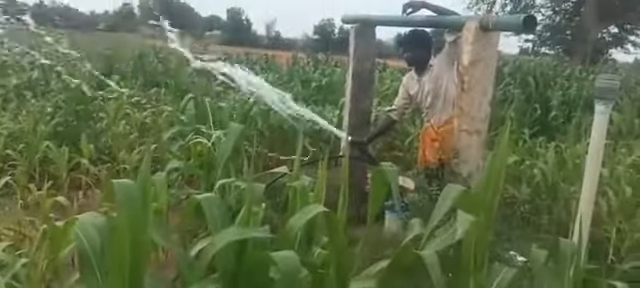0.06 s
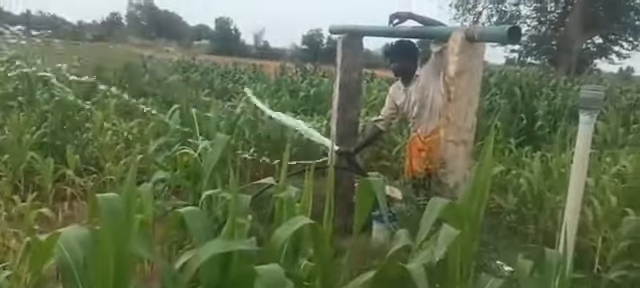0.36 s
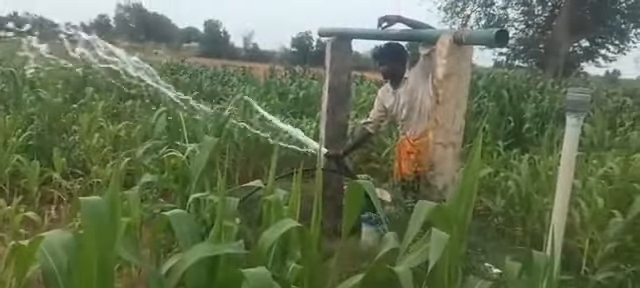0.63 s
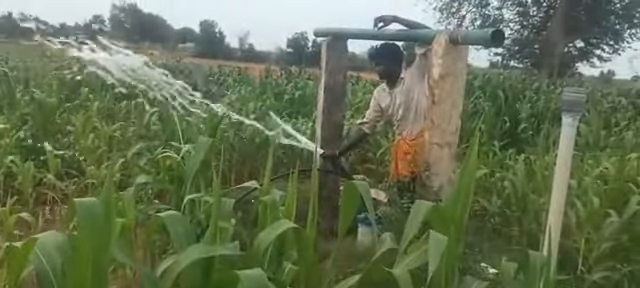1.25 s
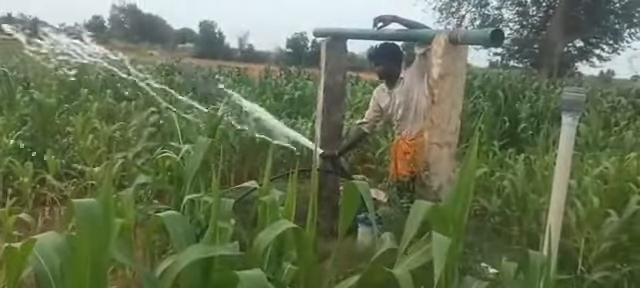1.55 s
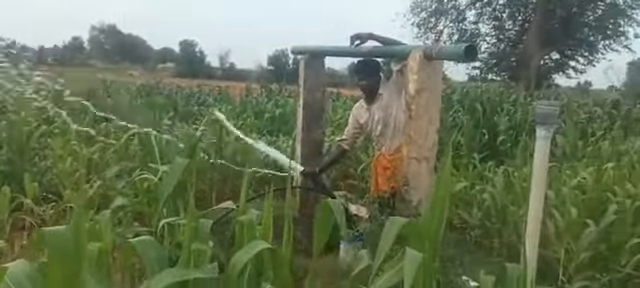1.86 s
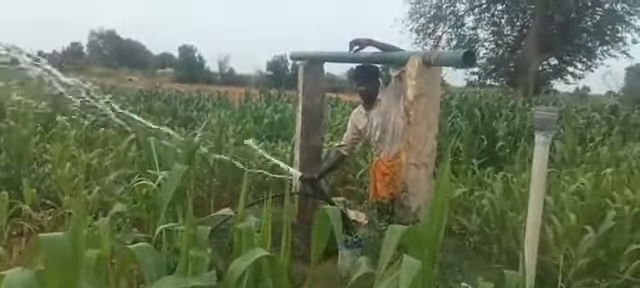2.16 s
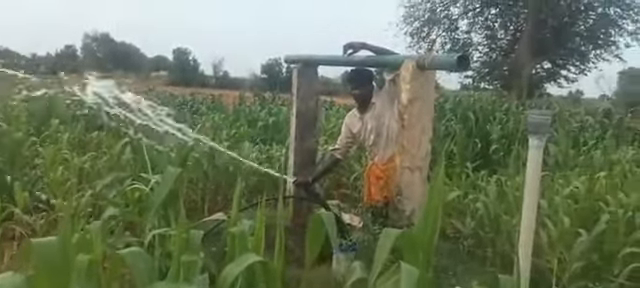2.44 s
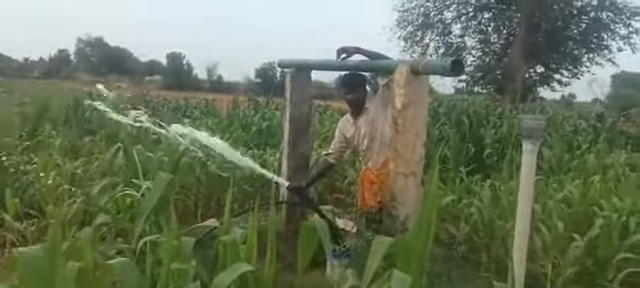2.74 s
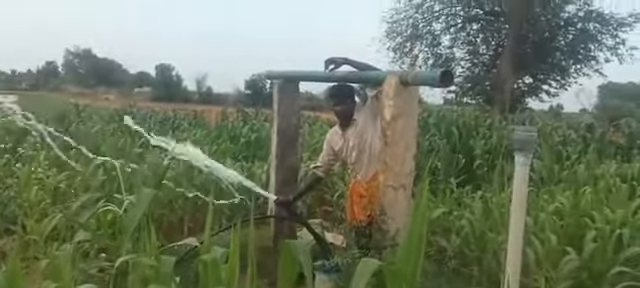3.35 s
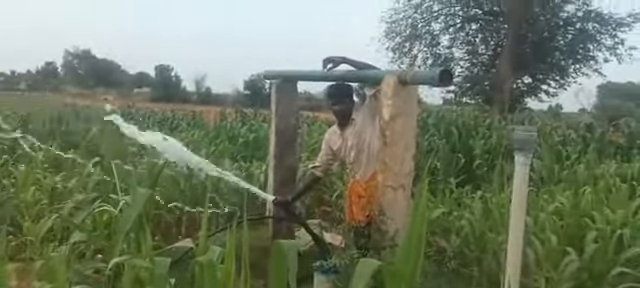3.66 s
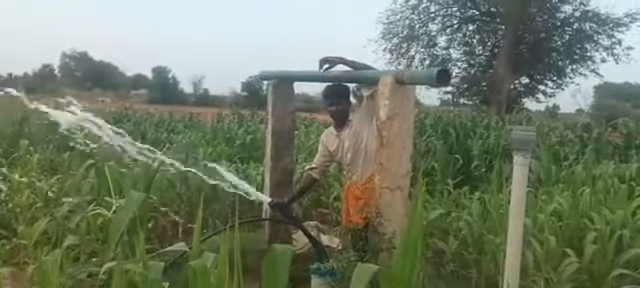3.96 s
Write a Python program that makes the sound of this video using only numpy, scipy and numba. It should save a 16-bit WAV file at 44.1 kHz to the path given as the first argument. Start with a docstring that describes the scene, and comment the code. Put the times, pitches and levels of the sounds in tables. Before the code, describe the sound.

Surges of water and air sputter from a pipe in a farm field, nearly three a second, with splashing spray, pops and the odd glug. Wind rumble on the phone microphone starts faint, then grows into thumping gusts.

```python
"""From the start a borewell pipe throws water and air across a crop field a few metres away, in surges
nearly three a second. In each surge the jet tears and hisses, the mouth rings and spray fizzes over
the leaves. Spits and popping air pockets soon join in, and after a second the odd hollow glug.
Gusts, faint at first, buffet the two microphone ports of a phone in turn, hardest towards the end."""
import sys
import numpy as np
from scipy import signal
from scipy.fft import rfft, irfft
from scipy.io import wavfile
from numba import njit

SR = 44100
rng = np.random.default_rng(int(sys.argv[2]) if len(sys.argv) > 2 else 0)


def put_to_file(sound):
    """Save the sound as 16-bit audio at rate SR, in the file named by the first command-line argument."""
    columns = np.atleast_2d(sound).T  # one column per channel
    safe = np.clip(columns, -1, 1)
    whole_steps = np.round(safe * 32767)
    wavfile.write(sys.argv[1], SR, whole_steps.astype(np.int16))


N = 176400
T = np.arange(N) / SR

# Surges of the jet. Each row: time in seconds, relative levels of the gush and of the air hiss in dB.
SURGES = [(0, -63, -57), (0.05, -53.5, -42.5), (0.135, -48, -39.5), (0.145, -42, -32.5), (0.25, -33.5, -33),
          (0.33, -38.5, -45), (0.39, -36, -37.5), (0.42, -47.5, -41), (0.46, -38.5, -41), (0.56, -32, -34),
          (0.63, -40, -39.5), (0.675, -33.5, -33), (0.69, -46.5, -45.5), (0.79, -56, -44.5),
          (0.865, -56, -40), (0.885, -37, -28), (0.935, -39.5, -37), (1.0, -32, -38), (1.1, -40, -43.5),
          (1.165, -43, -36.5), (1.2, -37.5, -30.5), (1.26, -34, -27), (1.31, -38, -37), (1.37, -32.5, -40),
          (1.39, -44, -43), (1.44, -49.5, -37), (1.46, -42, -30.5), (1.53, -33, -39.5), (1.59, -39.5, -37),
          (1.69, -38.5, -31), (1.71, -41.5, -37.5), (1.87, -55, -43.5), (2.0, -42.5, -40.5),
          (2.04, -37.5, -31), (2.07, -36, -43.5), (2.13, -43.5, -33.5), (2.165, -34, -36),
          (2.21, -50.5, -46.5), (2.35, -46.5, -38), (2.39, -34, -34), (2.425, -44, -38),
          (2.48, -33.5, -32.5), (2.52, -48, -38), (2.7, -54, -41), (2.715, -38, -31.5),
          (2.83, -42.5, -36.5), (2.88, -38.5, -42), (2.92, -54.5, -39), (3.02, -59.5, -48),
          (3.035, -52.5, -42.5), (3.15, -45.5, -36), (3.2, -35.5, -29.5), (3.28, -32.5, -34.5),
          (3.3, -43.5, -47), (3.355, -51, -47), (3.43, -55, -35), (3.48, -37, -34), (3.55, -43, -39.5),
          (3.61, -33, -34), (3.665, -39.5, -36.5), (3.69, -50, -47), (3.77, -51.5, -37.5),
          (3.865, -31.5, -31), (3.91, -44, -43), (4.0, -43.5, -38.5)]


def undb(db):
    return 10 ** (np.asarray(db) / 20)


def unit(x):
    return x / np.sqrt(np.mean(x ** 2))


def add(out, start_s, sound):
    i = int(np.clip(start_s * SR, 0, N - 1))
    out[i:i + len(sound)] += sound[:N - i]


def envelope(table, column):
    """Amplitude envelope: levels in dB against time become a gain for every sample."""
    rows = np.array(table, float)
    return undb(np.interp(T, rows[:, 0], rows[:, column]))


def response(table, size, column=1):
    """Magnitude response: levels in dB against frequency become a gain for every bin."""
    rows = np.array(table, float)
    bin_hz = np.arange(size // 2 + 1) * SR / size
    return undb(np.interp(np.log(bin_hz + 1), np.log(rows[:, 0]), rows[:, column]))


def colour(x, table, column=1, size=8192):
    """Minimum-phase filtering: folding the cepstrum gives a causal filter with the given spectrum."""
    cepstrum = irfft(np.log(response(table, size, column)))
    cepstrum[1:size // 2] *= 2
    cepstrum[size // 2 + 1:] = 0
    return signal.fftconvolve(x, irfft(np.exp(rfft(cepstrum))))[:N]


def wander(per_s):
    """Random modulation: interpolated Gaussian values with a spread near 1."""
    points = rng.standard_normal(N // 20)
    return np.interp(T * per_s, np.arange(len(points)), points) * np.sqrt(3 / 2)


def impacts(per_s, spread_db):
    """Shot noise: independent impulses of random sign and uneven size."""
    hits = (rng.random(N) < per_s / SR) * rng.choice([-1, 1], N)
    return unit(hits * undb(spread_db * np.clip(rng.standard_normal(N), -2, 2)))


def ring(t, hz, decay_s, glide_per_s):
    """Damped oscillation: a decaying sine whose frequency may glide linearly."""
    return np.exp(-t / decay_s) * np.sin(2 * np.pi * hz * (t + glide_per_s * t * t / 2))


@njit
def resonate(x, hz, q):
    """Forced resonance: one mode with a moving centre frequency and a gain near 1 there."""
    y, state = np.empty(len(x)), 0j
    for i in range(len(x)):
        omega = 2 * np.pi * hz[i] / SR
        state = state * np.exp(omega * (1j - .5 / q)) + x[i] * omega / q
        y[i] = state.real
    return y


def wind(port_limit=.26):
    """Turbulent pressure: eddies rumble and thump on each port separately; saturation rounds the peaks."""
    # Each row: time in seconds, relative levels at the left and right ports in dB.
    gusts = [(0, -54, -48.5), (.12, -62, -58), (.2, -59, -45), (.35, -66, -64), (.8, -55, -65),
             (1.02, -58, -41.5), (1.15, -68, -61), (1.36, -55.5, -53), (1.55, -67, -63), (1.9, -55, -56),
             (1.95, -57, -42.5), (2.1, -57, -55.5), (2.36, -51.5, -70), (2.4, -52, -32), (2.48, -42.5, -44),
             (2.66, -45, -60), (2.69, -20, -53), (2.76, -30, -52), (2.81, -45, -57), (2.88, -43, -38.5),
             (2.96, -34, -60), (3.15, -33, -41), (3.19, -39, -16.5), (3.45, -38.5, -21.5),
             (3.53, -54, -31.5), (3.66, -45, -19), (3.8, -69, -45), (4.0, -56, -63)]
    # Each row: frequency in Hz, gain in dB.
    eddy_spectrum = [(15, -8.5), (55, 8.5), (115, 3.5), (170, -3.5), (250, -13.5), (350, -24.5)]
    # Each row: start in seconds, relative level in dB, port struck.
    hard_eddies = [(2.396, -15.5, "R"), (2.707, -17.5, "L"), (3.196, -8, "R"), (3.238, -8, "R"),
                   (3.307, -19, "R"), (3.332, -16.5, "R"), (3.45, -12, "R"), (3.648, -8, "R"),
                   (3.773, -19.5, "R")]
    out = np.zeros((2, N))
    for side in range(2):
        buffeting = rng.standard_normal(N) * undb(4 * wander(per_s=70))
        out[side] = undb(-1) * envelope(gusts, side + 1) * unit(colour(buffeting, eddy_spectrum))
    pulse = ring(T[:SR // 20], hz=105.4, decay_s=.0063, glide_per_s=0)
    thump = signal.sosfilt(signal.butter(4, 230, fs=SR, output="sos"), pulse)
    for start, db, port in hard_eddies:
        add(out["LR".index(port)], start, undb(db) * thump)
    rounded = port_limit * np.tanh(out / port_limit)
    return signal.sosfilt(signal.butter(10, 390, fs=SR, output="sos"), rounded)


def scatter(x, scatter_db, size=4096, hop=512, port_lag_s=.00137):
    """Multipath scattering: as the water moves, each splash echoes off pillars and leaves by new paths."""
    # Each row: frequency in Hz, scattered against direct sound in dB before scatter_db is added.
    scatter_spectrum = [(300, -6), (700, -5), (1200, 0), (2200, -2), (4000, 2), (6000, 10), (15000, 16)]
    share = response(scatter_spectrum, 2 * size) * undb(scatter_db)
    t, starts = T[:size], np.arange(0, N, hop)
    frames = np.pad(x, (0, 2 * hop))[starts[:, None] + np.arange(2 * hop)]
    splashes = rfft(frames * signal.get_window("hann", 2 * hop), 2 * size)
    tail = np.exp(-t / .0018) + undb(-13) * np.exp(-t / .018)  # quick scatter, then the fainter field
    tail /= np.sqrt(np.sum(tail ** 2))
    out = np.zeros((2, N))
    for side, lag_s in enumerate((port_lag_s, 0)):  # sound reaches the right port first
        echoes = rfft(rng.standard_normal((len(starts), size)) * tail, 2 * size)
        delay = np.exp(-1j * np.pi * np.arange(size + 1) * SR / size * lag_s)
        arrivals = irfft(splashes * delay * (1 + share * echoes) / np.sqrt(1 + share ** 2))
        for start, sound in zip(starts, arrivals):
            add(out[side], (start + .5) / SR, sound[:size + 2 * hop])
    return out


def spray(follow=.21):
    """Incoherent sources: droplets fizz with each surge, spread so wide that each port hears its own."""
    # Each row: frequency in Hz, gain in dB.
    droplet_spectrum = [(450, -20.5), (900, -16.5), (4500, -24.5), (6000, -13.5), (8000, -5.5), (15000, -4)]
    swell = (envelope(SURGES, 1) * envelope(SURGES, 2)) ** follow
    level = undb(-7.5) * swell * undb(2.3 * wander(per_s=450))
    droplets = [level * impacts(per_s=12000, spread_db=1.5) for side in range(2)]
    return np.array([colour(patter, droplet_spectrum) for patter in droplets])


def glugs(decay_s=.022):
    """Cavity resonance: air drawn into the pipe between surges rings roughly, swelling as its pitch sags."""
    # Each row: start in seconds, relative level in dB, initial pitch in Hz.
    gulps = [(1.118, -38, 730), (1.395, -36.5, 625), (2.72, -33, 762), (3.28, -38, 797)]
    out, t = np.zeros(N), T[:SR // 10]
    for start, db, hz in gulps:
        roughness = 1 + wander(per_s=166)[:len(t)]
        add(out, start, undb(db) * roughness * t / decay_s * ring(t, hz, decay_s, glide_per_s=-2.2))
    return out


def bursts(size=2600, spit_rise_s=.003, spit_decay_s=.005):
    """Transient excitation: large air pockets burst with a crack and a rising ring; smaller ones spit."""
    # Each row: start in seconds, relative level in dB, initial pitch in Hz.
    pops = [(0.478, -16.5, 2095), (0.508, -19.5, 1560), (0.519, -16, 1800), (.539, -13.5, 2175),
            (.921, -17, 2023), (0.947, -18, 2100), (1.07, -14.5, 1690), (1.196, -20, 1910),
            (1.352, -24, 1510), (1.537, -18, 1920), (1.75, -27.5, 2850), (2.16, -23, 2150),
            (2.343, -24, 1320), (2.391, -13.5, 1740), (2.447, -14, 1614), (2.711, -20, 2460),
            (2.866, -28, 1450), (3.232, -15.5, 1860), (3.481, -20.5, 3060), (3.97, -22, 1750)]
    # Each row: start in seconds, relative level in dB, centre of the noise band in Hz.
    spits = [(0.143, -15, 5000), (0.432, -17, 5700), (0.588, -19, 5260), (0.88, -15, 5640),
             (1.116, -13.5, 5230), (1.248, -18, 5160), (2.143, -16.5, 4860), (2.255, -14.5, 9500),
             (2.637, -18, 6100), (3.031, -23, 5700), (3.103, -20, 6360), (3.123, -13.5, 6200),
             (3.233, -15.5, 3640), (3.366, -22, 5630), (3.654, -19.5, 5200), (3.944, -24, 5600)]
    out, t = np.zeros(N), T[:size]
    for start, db, hz in pops:
        crack = undb(-14) * rng.standard_normal(size) * np.exp(-t / .0052)
        add(out, start, undb(db) * (ring(t, hz, decay_s=.0032, glide_per_s=10) + crack))
    for start, db, hz in spits:
        band = signal.butter(1, [hz * .87, hz * 1.155], "band", fs=SR)
        hiss = unit(signal.lfilter(*band, rng.standard_normal(size)))
        add(out, start, undb(db) * hiss * (1 - np.exp(-t / spit_rise_s)) * np.exp(-t / spit_decay_s))
    return out


def pipe_mouth(flow, drift=.012):
    """Normal modes: the flow rings the mouth, whose resonances shift as water fills and leaves it."""
    # Each row: nominal frequency in Hz, relative gain in dB.
    modes = [(2150, 1.5), (2760, -12), (3500, -12), (5130, -3)]
    # Each row: time in seconds, strength of the ringing in dB, ratio applied to the mode frequencies.
    filling = [(.5, -16, 0.986), (1.7, -7.5, 1.045), (2.1, -19, 0.63), (2.8, -9, 1.07), (3.5, 1, 0.79)]
    times, _, ratios = np.array(filling).T
    tuning = np.interp(T, times, ratios)
    ringing = np.zeros(N)
    for hz, db in modes:
        ringing += undb(db) * resonate(flow, hz * tuning * (1 + drift * wander(per_s=14)), q=20)
    return flow + envelope(filling, 1) * ringing


def bubbles(low_hz, high_hz, cycles, spread_db, count, size=1500):
    """Bubble resonance: each small air pocket rings with its own rising pitch, decay and strength."""
    out = np.zeros(N)
    for when, pitch, length, strength in rng.random((count, 4)):
        hz = low_hz * (high_hz / low_hz) ** pitch
        tone = ring(T[:size], hz, decay_s=cycles * (.5 + length) / hz, glide_per_s=1)
        add(out, when * N / SR, undb(spread_db * strength ** 2) * np.sqrt(hz) * tone)
    return unit(out)


def churn(x, bands=32, depth_db=2.7):
    """Spectral modulation: the shifting shape of the water favours now one narrow band, now another."""
    spectrum, out = rfft(x), np.zeros(N)
    bin_hz = np.arange(len(spectrum)) * SR / N
    band_position = np.interp(np.log(bin_hz + 1), np.log([500, 8000]), [0, bands - 1])
    for k in range(bands):
        triangle = np.maximum(1 - np.abs(band_position - k), 0)
        out += irfft(spectrum * triangle, N) * undb(depth_db * wander(per_s=22))
    return unit(out)


def gush():
    """Jet break-up: water tears into slugs and drops at the mouth; trapped air gurgles and hisses out."""
    # Each row of both spectra: frequency in Hz, gain in dB.
    water_spectrum = [(150, -5.5), (370, -2.5), (520, -10.5), (720, -11.5), (1000, -3), (1500, -7),
                      (2500, -3), (3400, -1), (4500, -6), (6000, -9.5), (8000, -42), (15000, -26)]
    hiss_spectrum = [(1200, -24.5), (2200, -17.5), (3200, -16.5), (4300, -4.5), (7500, -3.5), (15000, -11)]
    tearing = impacts(per_s=30000, spread_db=2.5) * undb(1.6 * wander(per_s=110))
    gurgle = bubbles(low_hz=700, high_hz=2300, cycles=8, spread_db=6, count=1100)
    water = envelope(SURGES, 1) * (undb(13.5) * churn(tearing) + undb(3) * gurgle)
    air = unit(rng.standard_normal(N) * undb(2 * wander(per_s=200)))
    hiss = undb(12) * envelope(SURGES, 2) * air
    return colour(water, water_spectrum) + colour(hiss, hiss_spectrum)


def scene():
    """Superposition: the water sounds sum and share one overall tone on each side; wind adds to them."""
    # Overall tone of the pipe and splashing water. Each row: frequency in Hz, left and right gains in dB.
    water_colour = [(450, -20, -20), (680, -13, -12), (1000, -15, -22), (1300, -9, -11), (1650, -4.5, -9.5),
                    (1900, -5, -12), (2150, -4, -2.5), (2450, -5, -6), (2720, -4, -5), (3050, -8, -7),
                    (4500, -10, -4), (5150, -7, -1.5), (6050, -3.5, -1.5), (6800, -11, -12),
                    (8000, -16, -26), (9500, -10, -29), (10500, -9, -36), (11800, -18, -35),
                    (13500, -35, -40), (14800, -24, -28)]
    jet = pipe_mouth(gush()) + glugs()
    water = scatter(jet, scatter_db=0) + scatter(bursts(), scatter_db=-7) + spray()
    return np.array([colour(water[side], water_colour, side + 1) for side in range(2)]) + wind()


def record(dry):
    """Band limiting: the phone cuts the treble above 15750 Hz."""
    return signal.sosfilt(signal.ellip(10, .2, 80, 15750, fs=SR, output="sos"), dry)


dry = scene()
out = record(dry)
put_to_file(out)
```